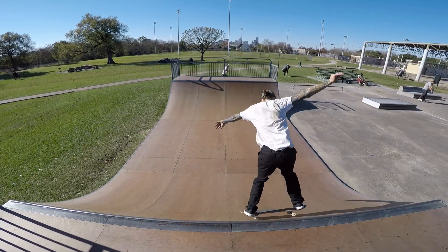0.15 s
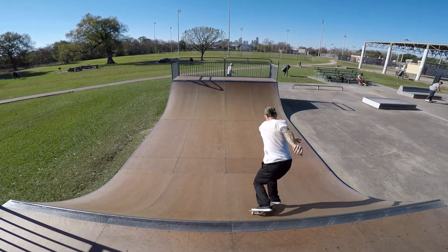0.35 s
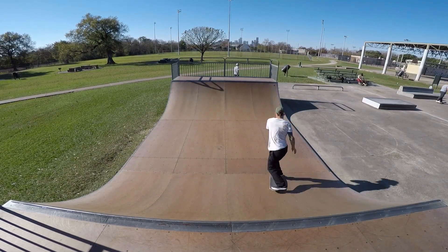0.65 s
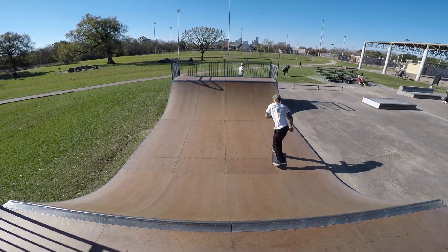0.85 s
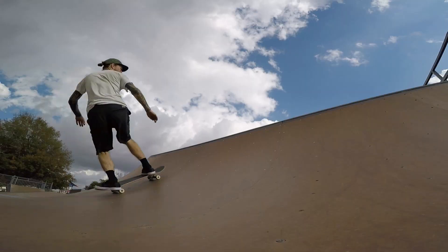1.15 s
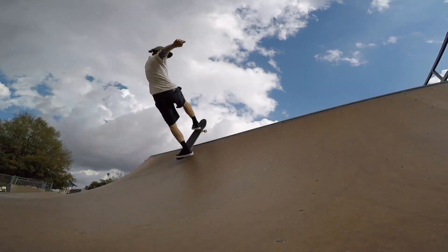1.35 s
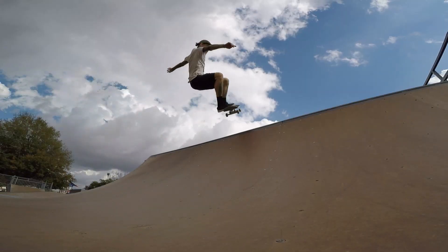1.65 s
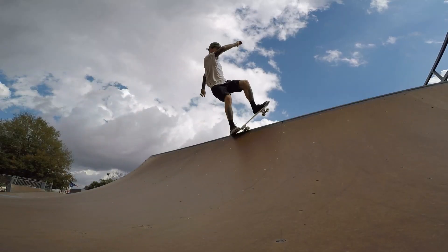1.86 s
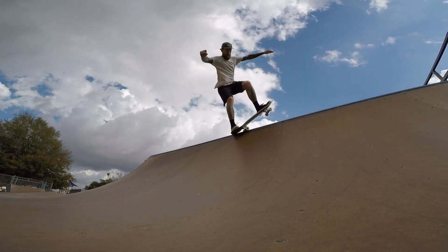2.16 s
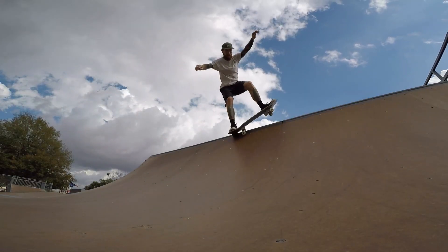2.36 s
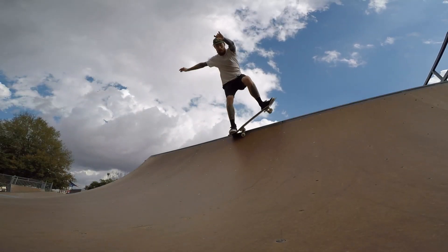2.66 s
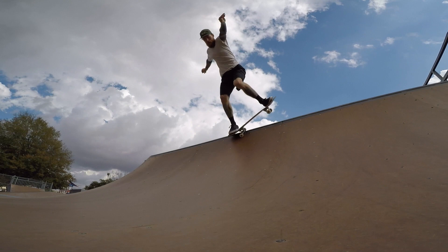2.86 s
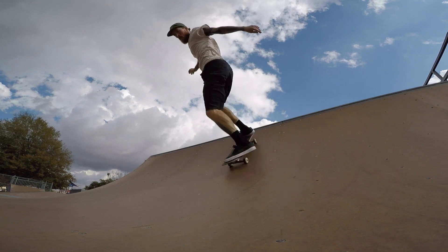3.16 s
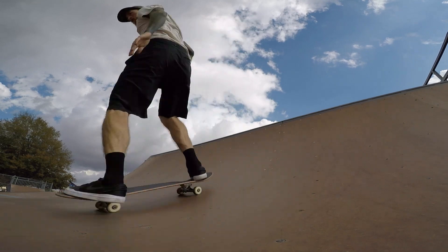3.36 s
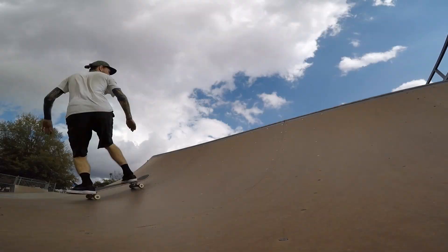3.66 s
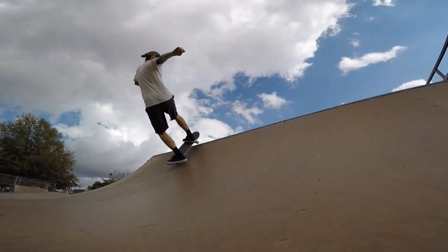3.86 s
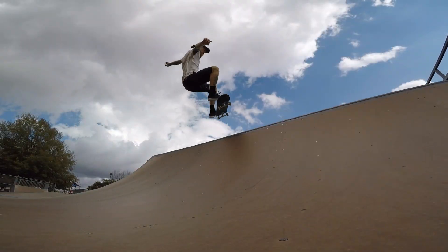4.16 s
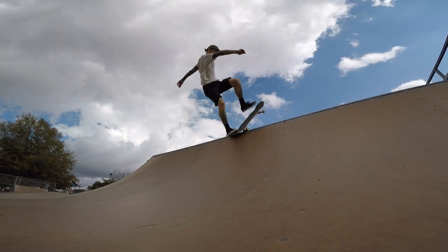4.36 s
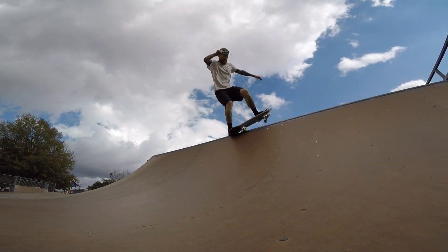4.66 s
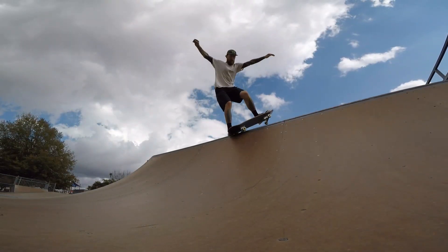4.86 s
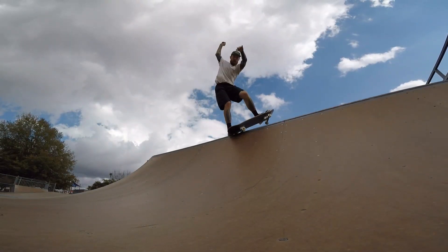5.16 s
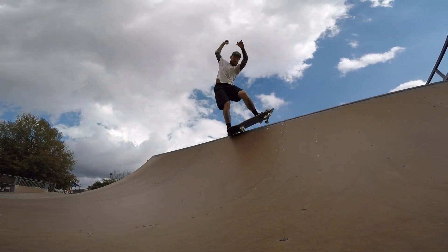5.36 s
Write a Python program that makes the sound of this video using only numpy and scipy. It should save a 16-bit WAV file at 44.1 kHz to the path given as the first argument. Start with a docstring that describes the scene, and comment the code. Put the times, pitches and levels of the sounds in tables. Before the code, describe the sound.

A skateboard thuds onto a booming ramp and rolls, then twice clacks onto the metal edge, balances with ticks and squeaks.

```python
"""A skateboarder drops into a deep, booming mini ramp: wheels thud, trucks clink, and he rolls away.
At 1.12 s a second, higher-ringing ramp takes over, its skin droning under his weight. He pops the
board, lands on the coping and balances with dry ticks; rubber squeaks and the tail scuffs off.
He rolls back over hollow plywood, pops and lands again, and balances with ticks, squeaks and a thin
whine. Throughout, a limiter ducks under the heavy blows and slowly recovers."""
import sys
import numpy as np
from scipy import signal
from scipy.fft import rfft, irfft, next_fast_len
from scipy.io import wavfile
from scipy.ndimage import uniform_filter1d, minimum_filter1d, map_coordinates

SR = 44100
rng = np.random.default_rng(int(sys.argv[2]) if len(sys.argv) > 2 else 0)


def wav_out(sig):
    """Save sig, one row per channel (or a flat mono array), as 16-bit PCM at SR to the path in sys.argv[1]."""
    wavfile.write(sys.argv[1], SR, np.round(np.clip(np.atleast_2d(sig).T, -1, 1) * 32767).astype(np.int16))


N = 242991

# Spectra of the second ramp and the wheels on it: (frequency [Hz], relative gain [dB])
SKIN_SPECTRUM = [(60, -61.5), (118, -20.5), (142, -7), (155, -2), (174, 3), (200, -2.5), (225, -9),
                 (260, -27), (330, -28.5), (450, -67.5), (900, -120)]
GROWL_SPECTRUM = [(70, -36.5), (100, -15), (130, 4), (175, -6.5), (235, 3), (290, 3.5), (370, -2.5),
                  (520, -6), (610, -15), (700, -5.5), (900, -17.5), (1200, -19.5), (1400, -27.5),
                  (2400, -100)]
WHIRR_SPECTRUM = [(900, -50.5), (1400, -18), (1660, 8), (1800, 5.5), (2000, 4.5), (2300, -19.5),
                  (2850, -31.5), (3300, -15.5), (3900, -35.5), (4800, -42.5), (5900, -35.5), (6600, -46),
                  (7300, -48), (14000, -81.5)]
RASP_SPECTRUM = [(2200, -28), (2800, -10.5), (3400, 5), (4000, 1), (4500, -13.5), (5600, -25),
                 (6600, -10.5), (7300, -29), (12000, -49)]
# Resonances of its hollow panels: (frequency [Hz], relative level [dB])
PLYWOOD_MODES = [(270, 15.5), (315, 5.5), (409, -1), (475, -13.5), (530, -3.5), (605, 2.5), (695, -6.5),
                 (755, -3)]
# The rider's weight pressing into it: (time [s], hold [s], drone level [dB])
SKIN_LOADS = [(1.119, 0.054, -17.5), (1.3, 0.14, -19), (1.71, 0.018, -13.5), (2.987, 0.049, -11),
              (3.154, 0.37, -14.5), (3.513, 0.077, -17.5), (3.716, 0.12, -13.5), (4.266, 0.21, -18.5)]
# Wheel passes, one list each: (time [s], growl [dB], whirr [dB], relative rasp [dB])
WHEEL_PASSES = [
    [(1.11, -34.5, -45, -66), (1.135, -33.5, -49, -70.5), (1.22, -32.5, -49.5, -63.5),
     (1.27, -36, -52.5, -62), (1.31, -43.5, -63, -72), (1.35, -36.5, -56, -63), (1.42, -30.5, -57.5, -61),
     (1.52, -78.5, -77, -83.5)],
    [(2.82, -53.5, -54.5, -75), (2.98, -40, -62.5, -59), (3.09, -50, -58, -73), (3.16, -32.5, -42, -75),
     (3.255, -22, -36, -52), (3.3, -24.5, -35.5, -55), (3.35, -21.5, -36, -55.5),
     (3.49, -34.5, -40.5, -55.5), (3.57, -31, -51, -58), (3.67, -35, -56, -61.5), (3.72, -31, -46, -60.5),
     (3.8, -23, -49.5, -59.5), (3.87, -31.5, -53.5, -67), (3.95, -29, -58, -64), (4.04, -49, -81.5, -85.5)],
]
# Balancing on the coping: (start [s], end [s], drone level [dB])
COPING_STALLS = [(1.766, 3.005, -19.5), (4.426, 5.6, -23.5)]

# Single blows of tail, trucks and wheels, and landings: (time [s], knock [dB], clack [dB], crack [dB])
SINGLE_BLOWS = [(1.367, -18.5, -21, -30), (1.419, -33, -46, -46.5), (1.461, -38.5, -53.5, -63),
                (1.742, -17.5, -25.5, -54), (1.771, -11.5, -16.5, -40), (2.249, -36.5, -26, -40),
                (2.449, -29.5, -44, -55.5), (2.993, -16.5, -21.5, -48.5), (3.018, -17, -15.5, -37.5),
                (3.039, -7, -14.5, -40), (3.057, -6, -9.5, -38.5), (3.415, -4.5, -19, -37.5),
                (3.429, -11.5, -18.5, -43), (3.463, -10, -12.5, -39.5), (3.469, -7.5, -14.5, -41),
                (3.499, -11.5, -15.5, -44.5), (3.521, -17, -26.5, -55.5), (3.754, -21.5, -25.5, -50),
                (3.781, -26, -34, -44.5), (3.807, -23.5, -26.5, -64), (3.819, -33.5, -29.5, -38.5),
                (3.907, -20.5, -26.5, -46), (3.933, -27, -31.5, -35.5), (3.962, -33, -40, -51),
                (4.342, -19, -27.5, -50), (4.378, -15, -45.5, -59), (4.4, -22.5, -22, -39)]
BOARD_LANDINGS = [(1.704, -11, -19, -27.5), (2.998, -7.5, -24, -39.5), (4.284, -11.5, -13, -27)]
# Tail and trucks striking edge on: (time [s], relative level [dB])
EDGE_STRIKES = [(1.370, -37), (1.708, -16.5), (1.716, -31), (4.291, -14)]
# The deck bending under heavy blows: (time [s], level [dB], tilt [dB/octave])
DECK_FLEXES = [(1.367, -31.5, 2), (1.388, -34.5, 31), (1.706, -10.5, -9.5), (1.728, -15.5, 11.5),
               (1.772, -19.5, -0.5), (3.001, -16, -3), (3.04, -26, -13), (3.416, -18.5, 7),
               (3.467, -14, -7.5), (3.778, -25.5, 15), (3.908, -27, 18), (4.284, -17, -1.5),
               (4.299, -7.5, -6)]
# The truck slapping coping or ramp: (time [s], slap [dB], after-ring [dB])
TRUCK_SLAPS = [(1.769, -7, -41.5), (3.039, -9, -53), (3.059, -3.5, -44), (3.417, -21, -56),
               (3.502, -12, -56.5), (4.398, -5, -33), (4.407, -14, -58.5)]
# Spectra of these impacts: (frequency [Hz], relative gain [dB])
KNOCK_SPECTRUM = [(70, -21.5), (125, 11), (175, 0), (260, 8.5), (330, -8.5), (420, -4), (520, -4),
                  (610, -7.5), (690, -12.5), (870, -18), (1300, -44.5), (2500, -120)]
CLACK_SPECTRUM = [(500, -33), (880, -3), (1080, 9), (1330, -2.5), (1470, -3.5), (1680, 8.5), (1950, 2),
                  (2250, -8.5), (3000, -54), (5000, -120)]
CRACK_SPECTRUM = [(1200, -55), (2400, -1.5), (3200, -2.5), (4000, 0), (5000, -17.5), (6600, -13),
                  (7500, -25.5), (9500, -24), (14000, -45.5)]
EDGE_SPECTRUM = [(1600, -36.5), (2300, 7), (2750, 7), (3200, 6.5), (3700, -22.5), (4500, -8.5), (6000, -26),
                 (9000, -35.5), (14000, -50.5)]
TRUCK_SPECTRUM = [(1200, -49.5), (1650, 1.5), (1850, 13), (2020, 9), (2300, -10), (2900, -21),
                  (3500, -17.5), (4000, -23), (4700, -44.5), (6500, -48.5), (9000, -70)]
# Modes of the coping, the metal truck and the wooden decks: (frequency [Hz], relative level [dB], t60 [s])
COPING_MODES = [(1030, -6.5, 0.034), (1178, -13, 0.16), (1520, -12, 0.13), (1683, -7, 0.1),
                (1710, -9.5, 0.071), (1990, -7, 0.068)]
TRUCK_MODES = [(1723, -3, .13), (1981, 0, .12), (3375, -13, .2), (3760, -14, .12), (3890, -12, .14),
               (4090, -14, .14)]
DECK_MODES = [(305, -19, 0.16), (488, -16, 0.06), (529, -3, 0.11), (617, -6.5, 0.04), (692.3, -7, 0.12)]
FIRST_DECK_MODES = [(333, 0.5, 0.11), (452.4, -2, 0.23), (555, -15.5, 0.39), (1183, -20, 0.18),
                    (1380, -25.5, 0.22), (1440, -30, 0.35)]

# The first ramp's boom, following the wheels' pressure: (time [s], level [dB])
BOOM_LEVELS = [(0.02, -20), (0.085, -41), (0.17, -20), (0.52, -23), (0.68, -26), (1.04, -18.5), (1.12, -27)]
# Wheels thudding onto it and over its seams: (time [s], thud [dB], rattle [dB])
WHEEL_THUDS = [(0.102, -25, -36), (0.112, -26, -38.5), (0.125, -31, -39.5), (0.15, -35, -47.5),
               (0.179, -33, -48.5), (0.279, -29.5, -47.5), (0.302, -37.5, -49.5), (0.486, -34.5, -50),
               (0.683, -28, -41), (0.716, -35, -47), (0.739, -24.5, -51), (0.77, -31.5, -41),
               (0.885, -31.5, -36), (0.925, -35.5, -41.5), (0.94, -35, -48)]
# Loose trucks clinking: (time [s], level [dB])
TRUCK_CLINKS = [(0.102, -37.5), (0.11, -47.5), (0.124, -45.5), (0.144, -52), (0.156, -52.5), (0.263, -57),
                (0.276, -50.5), (0.301, -52), (0.485, -57.5), (0.772, -55.5)]
# Spectra of the first ride: (frequency [Hz], relative gain [dB])
BOOM_SPECTRUM = [(15, -21.5), (30, -9), (46, -10), (62, -7.5), (76, -6), (87, -21.5), (100, 0), (114, -27),
                 (140, -17), (160, -26.5), (220, -49), (400, -120)]
PANEL_SPECTRUM = [(150, -36), (200, -18), (255, 0), (300, -13), (355, -2.5), (420, -8), (520, -20.5),
                  (700, -30), (1200, -41), (2000, -120)]
FAR_WHEEL_SPECTRUM = [(350, -27.5), (600, 10), (726, -20), (790, -6.5), (1040, -11), (1130, -5.5),
                      (1630, -7.5), (1840, -6), (1990, -21.5), (2370, -7.5), (2770, -45), (3220, -12.5),
                      (4380, -39), (5690, -72.5), (9640, -120)]
THUD_SPECTRUM = [(150, -53.5), (260, -5.5), (350, 13.5), (440, -9.5), (560, -15), (750, -24), (1200, -25),
                 (2500, -120)]
RATTLE_SPECTRUM = [(480, -9.5), (620, 1.5), (900, 3.5), (1200, 4.5), (1650, 8.5), (2050, -5.5), (2400, -4),
                   (2800, -13), (3800, -17.5), (5000, -28), (9500, -30), (14000, -50.5)]
CLINK_SPECTRUM = [(1800, -23.5), (2400, 5.5), (2800, -3), (3300, 7), (3800, 2), (4350, -2), (5000, -16.5),
                  (6000, -14), (7000, -36), (9000, -19.5), (14000, -60)]

# Runs of dry ticks while balancing: (start [s], end [s], spacing [s], relative level [dB])
BALANCE_TICKS = [(1.885, 1.94, .046, 7), (1.989, 2.06, .054, 3), (2.158, 2.22, .051, -2),
                 (2.565, 2.735, .0385, -2), (4.474, 4.62, .0428, 2), (4.747, 5.02, .0382, 0)]
# The board shifting on the coping: (time [s], relative level [dB])
COPING_RUBS = [(1.82, -43), (2.005, -45.5), (2.058, -45), (2.158, -48.5), (2.3, -53), (4.388, -38.5),
               (4.734, -50.5), (4.78, -51), (5.102, -50.5)]
# Rubber squeaks: (time [s], length [s], start pitch [Hz], end pitch [Hz], relative level [dB],
# overtone gain [dB])
RUBBER_SQUEAKS = [(2.798, 0.03, 1180, 1480, -54, 5), (2.811, 0.05, 1730, 2400, -40.5, -1),
                  (2.851, 0.026, 2600, 2900, -45, -8), (2.886, 0.032, 3450, 3250, -47, -20),
                  (4.78, 0.055, 650, 920, -46, -4), (4.818, 0.048, 940, 1020, -43, 0),
                  (5.1, 0.03, 1030, 880, -42, -1), (5.12, 0.05, 960, 1100, -38.5, 0),
                  (5.108, 0.03, 3550, 3800, -54, -20), (5.21, 0.03, 1110, 990, -47, -5)]
# The tail scuffing off the coping: (time [s], level [dB])
TAIL_SCUFFS = [(2.797, -39.5), (2.872, -42.5), (2.93, -47)]
# Loose hardware shaking after a jolt: (time [s], length [s], relative level [dB])
HARDWARE_SHAKES = [(1.387, 0.05, -59.5), (1.735, 0.038, -56), (1.766, 0.018, -45), (1.788, 0.039, -60.5),
                   (3.0, 0.058, -53), (3.039, 0.009, -38.5), (3.058, 0.0087, -41), (3.412, 0.04, -55.5),
                   (3.461, 0.024, -50), (3.501, 0.031, -59), (3.752, 0.02, -58.5), (3.778, 0.028, -62),
                   (3.905, 0.022, -54.5), (3.926, 0.022, -55), (3.962, 0.018, -59.5), (4.331, 0.06, -64.5),
                   (4.396, 0.014, -40.5)]
# Spectra of the small sounds and the background: (frequency [Hz], relative gain [dB])
TICK_SPECTRUM = [(290, -9), (500, -1), (750, 0), (1050, -2), (1450, -16), (1750, -10), (2310, -32),
                 (2610, -48), (3300, -36), (4000, -50), (5200, -82), (8800, -120)]
SQUEAK_SPECTRUM = [(700, 6), (1100, 3), (2000, 0), (2400, -7), (2800, -18), (3100, -26), (3350, -9),
                   (3700, -13), (4000, -25), (4500, -24), (5500, -12), (6700, -10), (9000, -16),
                   (12000, -30)]
SCUFF_SPECTRUM = [(700, -32), (1800, 0.5), (2500, 14), (3200, 4), (4000, 3.5), (5000, 1), (7400, -3),
                  (8800, -0.5), (11000, -8), (13000, -33)]
WHINE_SPECTRUM = [(900, -24.5), (1090, -6.5), (1170, -5.5), (1250, -42.5), (1500, -27), (3000, -120)]
HARDWARE_SPECTRUM = [(900, -20.5), (1500, -5), (2000, 6), (2600, -8), (3300, -0.5), (4100, 2),
                     (4800, -15.5), (5600, -15.5), (6800, -20), (8000, -26), (13000, -38.5)]
LOW_RUMBLE_SPECTRUM = [(12, 0), (25, -11.5), (45, -7.5), (62, 3), (76, -4), (100, -6.5), (130, -20),
                       (250, -37.5), (500, -120)]
HISS_SPECTRUM = [(100, 14), (1500, 14), (2800, 5.5), (5000, 0), (7000, -3), (8800, 0.5), (11000, -7),
                 (14000, -19.5), (16000, -42)]


def second_ramp():
    """Forced vibration: load drives the skin, rolling drives the wheels; both tremble on in a stall."""
    t = np.arange(N) / SR
    stall = sum(amp(db) * swell(s, s, attack=0.046, fade_db_per_s=7) * (t < end)
                for s, end, db in COPING_STALLS)
    load_power = sum((amp(db) * swell(s, s + hold, attack=0.022, fade_db_per_s=41)) ** 2
                     for s, hold, db in SKIN_LOADS)
    growling, whirring, rasping = sum(amp(curves(rows)) * (t > rows[0][0]) * (t < rows[-1][0])
                                      for rows in WHEEL_PASSES)
    free_spin = amp(-67) * sum((t > s) * (t < end) for s, end, _ in COPING_STALLS)
    # Independent excitations add in power, hence hypot.
    skin = np.hypot(np.sqrt(load_power), stall) * rumble(SKIN_SPECTRUM, even_s=0.28, grit_db=0)
    # A steady low rumble, like wind, swells slightly during the stalls.
    low_gain = np.hypot(amp(-31.5), amp(-7.5) * stall)
    low_rumble = low_gain * rumble(LOW_RUMBLE_SPECTRUM, even_s=0.83, grit_db=6)
    growl_gain = np.hypot(growling + amp(-22) * stall, amp(-50.5))
    growl = growl_gain * rumble(GROWL_SPECTRUM, even_s=0.49, grit_db=2)
    whirr_gain = np.hypot(whirring + amp(-42) * stall, free_spin)
    whirr = whirr_gain * rumble(WHIRR_SPECTRUM, even_s=0.072, grit_db=1.5)
    rasp = amp(-7) * rasping * rumble(RASP_SPECTRUM, even_s=0.1, grit_db=4.5)
    return skin + low_rumble + growl + whirr + rasp + amp(-1.5) * growling * plywood()


def plywood(width_hz=45, lump_db=3.5, swing_db=6):
    """Resonance: bumps excite the panels' modes, each waxing and waning as the wheels travel; rms 1."""
    m = next_fast_len(N, True)
    f, track = np.fft.rfftfreq(m, 1 / SR), np.zeros(N)
    bumps = rfft(rng.standard_normal(N) * amp(lump_db * np.tanh(wobble(45))), m)
    damping = 1j * f * width_hz
    for hz, db in PLYWOOD_MODES:
        resonator = damping / (hz ** 2 - f ** 2 + damping)
        mode = irfft(bumps * resonator ** 2, m)[:N]
        track += amp(db + swing_db * np.tanh(wobble(15))) * unit(mode)
    return unit(track)


def blow(knock_db, clack_db, crack_db):
    """Impulse response: one contact cracks, clacks in the board, knocks the ramp and rings the coping."""
    knock = amp(knock_db) * burst(KNOCK_SPECTRUM, t60=0.17, rise=0.0058)
    clack = amp(clack_db) * burst(CLACK_SPECTRUM, t60=0.044, rise=0.003)
    crack = burst(CRACK_SPECTRUM, t60=0.024, rise=0.0018)
    crack += amp(-21) * burst(CRACK_SPECTRUM, t60=0.11, rise=0.0028)
    coping = amp((knock_db + clack_db) / 2 - 7) * ring(COPING_MODES, rise=0.0031, wander=1.2)
    return knock + clack + amp(crack_db) * crack + coping


def blows_and_landings(rebound_s=0.013, dulling_db=4):
    """Impact and rebound: a blow is one contact, a landing three, each with less crack than the last."""
    track = np.zeros(N)
    for s, *levels in SINGLE_BLOWS:
        add(track, s, blow(*levels))
    for s, knock_db, clack_db, crack_db in BOARD_LANDINGS:
        for k, weight_db in enumerate([-6.5, 0, -6]):  # first touch, full weight, rebound
            contact = blow(knock_db + weight_db, clack_db + weight_db / 2, crack_db - k * dulling_db)
            add(track, s + k * rebound_s, contact)
    return track


def deck_and_trucks():
    """Free vibration: the tail bites the coping, the flexed deck rings, the truck slaps and rings."""
    track = np.zeros(N)
    for s, db in EDGE_STRIKES:
        add(track, s, amp(db - 6) * burst(EDGE_SPECTRUM, t60=0.023, rise=0.00089))
    pivot_hz = DECK_MODES[2][0]
    for s, db, tilt in DECK_FLEXES:
        modes = [(hz, level + tilt * np.log2(hz / pivot_hz), t60) for hz, level, t60 in DECK_MODES]
        add(track, s, amp(db) * ring(modes, rise=0.0028, wander=0.25))
    for s, db, ring_db in TRUCK_SLAPS:
        add(track, s, amp(db) * burst(TRUCK_SPECTRUM, t60=0.021, rise=0.0016))
        add(track, s, amp(ring_db) * ring(TRUCK_MODES, rise=0.0016, wander=1.4))
    return track


def first_ramp():
    """Structure-borne sound: a big hollow ramp booms as the board thuds down, clinks and rolls away."""
    touchdown_s = WHEEL_THUDS[0][0]
    rolling = np.maximum(amp(-14), np.arange(N) > touchdown_s * SR)
    track = amp(curves(BOOM_LEVELS)[0]) * rumble(BOOM_SPECTRUM, even_s=0.035, grit_db=12.5)
    track += rolling * amp(-41) * rumble(PANEL_SPECTRUM, even_s=0.077, grit_db=3)
    grain = unit(amp(2 * wobble(50) + 2 * wobble(400)))
    track += rolling * grain * amp(-60.5) * rumble(FAR_WHEEL_SPECTRUM, even_s=0.16, grit_db=2.5)
    add(track, touchdown_s, amp(-22) * ring(FIRST_DECK_MODES, rise=0.00089, wander=0.31))
    for s, thud_db, rattle_db in WHEEL_THUDS:
        add(track, s, amp(thud_db) * burst(THUD_SPECTRUM, t60=0.25, rise=0.0018))
        rattle = burst(RATTLE_SPECTRUM, t60=0.04, rise=0.0012)
        rattle += amp(-9) * burst(RATTLE_SPECTRUM, t60=0.17, rise=0.004)
        add(track, s, amp(rattle_db) * rattle)
    for s, db in TRUCK_CLINKS:
        add(track, s, amp(db) * burst(CLINK_SPECTRUM, t60=0.036, rise=0.0013))
    return track


def first_ride(narrowing_db_per_s=19):
    """Interaural coherence: the two channels grow alike, so the sound narrows as the board leaves."""
    width = amp(-14.5 - narrowing_db_per_s * np.arange(N) / SR)
    mid = first_ramp()
    side = width * (first_ramp() - 0.57 * mid)
    return np.array([mid + side, mid - side])


def creaks(tick_db=-31.5, edge_sag_db=3, scatter_db=1.5):
    """Damped transients: the balancing board ticks in evenly spaced runs and shifts in short rubs."""
    track = np.zeros(N)
    for start, end, spacing, db in BALANCE_TICKS:
        for s in np.arange(start, end, spacing):
            sag_db = edge_sag_db * (2 * (s - start) / (end - start) - 1) ** 2
            wood = [(hz, level + 3 * rng.standard_normal()) for hz, level in TICK_SPECTRUM]
            tick = burst(wood, t60=0.018, rise=0.0006)
            add(track, s, amp(tick_db + db - sag_db + scatter_db * rng.standard_normal()) * tick)
    for s, db in COPING_RUBS:
        add(track, s, amp(db + 9.5) * burst(TRUCK_SPECTRUM, t60=0.096, rise=0.0086))
    return track


def squeaks(jitter=0.028, waver=0.012, flicker_db=4):
    """Harmonic oscillation: rubber sings in short, unsteady glides whose overtones flicker."""
    t, track = np.arange(N) / SR, np.zeros(N)
    for s, length, start_hz, end_hz, db, bright_db in RUBBER_SQUEAKS:
        progress = np.clip((t - s) / length, 0, 1)
        hz = start_hz + (end_hz - start_hz) * progress
        phase = 2 * np.pi * np.cumsum(hz * (1 + jitter * wobble(900) + waver * wobble(130))) / SR
        partials = [amp(along(SQUEAK_SPECTRUM, k * hz)) * np.sin(k * phase) / k for k in range(1, 5)]
        overtones = amp(bright_db) * sum(partials[1:])
        tone = partials[0] + amp(flicker_db * wobble(150)) * overtones
        track += np.sin(np.pi * progress) * amp(db + 3 * wobble(340)) * tone
    return track


def tail_scuffs():
    """Sliding friction: the tail scrapes off the coping in gritty swells of noise."""
    scrape = np.zeros(N)
    for s, db in TAIL_SCUFFS:
        add(scrape, s, amp(db) * burst(SCUFF_SPECTRUM, t60=0.17, rise=0.06))
    grit = unit(amp(1.5 * wobble(300)))
    return grit * scrape


def whine(start_s=5.07):
    """Narrow-band noise is heard as a pitch: a thin whine fades during the last stall."""
    envelope = amp(-46.5) * swell(start_s, start_s, attack=0.02, fade_db_per_s=34)
    return envelope * rumble(WHINE_SPECTRUM, even_s=0.07, grit_db=3)


def hardware_rattles(clicks_per_s=900):
    """Shot noise: after a jolt, washers and bearings chatter in a dense spray of uneven clicks."""
    t = np.arange(N) / SR
    shaking = sum(amp(db) * np.sqrt(np.abs(np.sin(np.pi * np.clip((t - s) / length, 0, 1))))
                  for s, length, db in HARDWARE_SHAKES)
    clicks = (rng.random(N) < clicks_per_s / SR) * rng.standard_normal(N)
    return amp(1.5) * colour(shaking * unit(clicks), HARDWARE_SPECTRUM)


def air():
    """Stationary noise: a faint hiss, almost fully coherent between the ears."""
    shared, left, right = [colour(rng.standard_normal(N), HISS_SPECTRUM) for _ in range(3)]
    return amp(-67) * (shared + amp(-21.5) * np.array([left, right]))


def rumble(spectrum, even_s, grit_db):
    """Random excitation: uneven bumps shake a body; the power is levelled over even_s, at rms 1."""
    x = colour(rng.standard_normal(N) * amp(grit_db * wobble(350)), spectrum)
    power = signal.fftconvolve(x ** 2, np.hanning(int(even_s * SR) + 3), "same")
    return unit(x / np.sqrt(np.abs(power) + 1e-12))


def burst(spectrum, t60, rise, contact_s=0.001):
    """Exponential decay: half a second of coloured noise swells from a contact and dies."""
    t = np.arange(SR // 2) / SR
    envelope = amp(-60 * t / t60) * (1 - np.exp(-t / rise)) * (1 - np.exp(-t / contact_s))
    x = colour(rng.standard_normal(len(t)) * envelope, spectrum)
    return x * np.linalg.norm(envelope) / np.linalg.norm(x)


def ring(modes, rise, wander):
    """Modal superposition: damped sines of random strength; chattering contact makes the pitch wander."""
    t, sound = np.arange(SR // 2) / SR, np.zeros(SR // 2)
    for hz, db, t60 in modes:
        drift = uniform_filter1d(uniform_filter1d(rng.standard_normal(len(t)), size=150), size=110)
        turns = hz * t + rng.random() + wander * np.cumsum(drift) / np.sqrt(SR)
        sound += amp(db + 2 * rng.standard_normal() - 60 * t / t60) * np.sin(2 * np.pi * turns)
    return sound * (1 - np.exp(-t / rise))


def colour(x, spectrum):
    """Minimum-phase filtering: shapes the spectrum causally; white noise keeps its power."""
    m = 2 * next_fast_len(len(x) // 2 + SR // 4)
    gain = unit(amp(along(spectrum, np.fft.rfftfreq(m, 1 / SR))))
    cepstrum = irfft(np.log(gain + 1e-6))
    cepstrum[1:m // 2] *= 2
    cepstrum[m // 2 + 1:] = 0
    return irfft(rfft(x, m) * np.exp(rfft(cepstrum)), m)[:len(x)]


def swell(start, end, attack, fade_db_per_s):
    """Envelope: a linear rise from start, an exponential decay from end."""
    t = np.arange(N) / SR
    return np.clip((t - start) / attack, 0, 1) * amp(-fade_db_per_s * np.maximum(t - end, 0))


def wobble(rate):
    """Random modulation: a smooth curve with rate knots a second."""
    return map_coordinates(rng.standard_normal(int(N * rate / SR) + 4), [np.arange(N) * rate / SR])


def along(spectrum, hz):
    """Interpolation of a spectrum on a logarithmic frequency axis."""
    f, db = np.transpose(spectrum)
    return np.interp(np.log(hz + 1), np.log(f), db)


def curves(rows):
    """Interpolation in time: one value per sample for each column after the first."""
    times, *columns = np.transpose(rows)
    return [np.interp(np.arange(N) / SR, times, column) for column in columns]


def add(track, s, sound):
    """Superposition of a sound on the track at s seconds."""
    part = track[round(s * SR):][:len(sound)]
    part += sound[:len(part)]


def amp(db):
    """Amplitude ratio of a level in decibels."""
    return 10 ** (np.asarray(db) / 20)


def unit(x):
    """Normalisation to rms 1."""
    return x / np.sqrt(np.mean(x ** 2) + 1e-20)


def scene(change_s=1.12):
    """Superposition: the first ramp in stereo gives way to the second in mono, with its contact sounds."""
    crossfade = uniform_filter1d(1.0 * (np.arange(N) > change_s * SR), size=400)
    ride = (1 - crossfade) * first_ride() + crossfade * second_ramp()
    impacts = blows_and_landings() + deck_and_trucks() + hardware_rattles()
    return ride + impacts + creaks() + squeaks() + tail_scuffs() + whine() + air()


def record(dry, ceiling_db=-8.5, recover_s=0.16, linger_s=0.81, linger_share=0.49, top_hz=15000):
    """Peak limiting: the gain drops at once and recovers at two rates; a low-pass bounds the band."""
    t = np.arange(N) / SR
    over_db = np.maximum(20 * np.log10(np.abs(dry).max(axis=0) + 1e-9) - ceiling_db, 1e-6)
    # Each overshoot is held and released exponentially.
    fast_db, slow_db = [np.exp(np.maximum.accumulate(np.log(over_db) + t / release) - t / release)
                        for release in (recover_s, linger_s)]
    duck_db = np.maximum(fast_db, linger_share * slow_db)
    gain = uniform_filter1d(minimum_filter1d(amp(-duck_db), size=200), size=180)
    m = next_fast_len(N + SR // 2)
    passband = np.fft.rfftfreq(m, 1 / SR) < top_hz
    return irfft(rfft(dry * gain, m) * passband, m)[:, :N]


dry = scene()
out = record(dry)
wav_out(out)
```